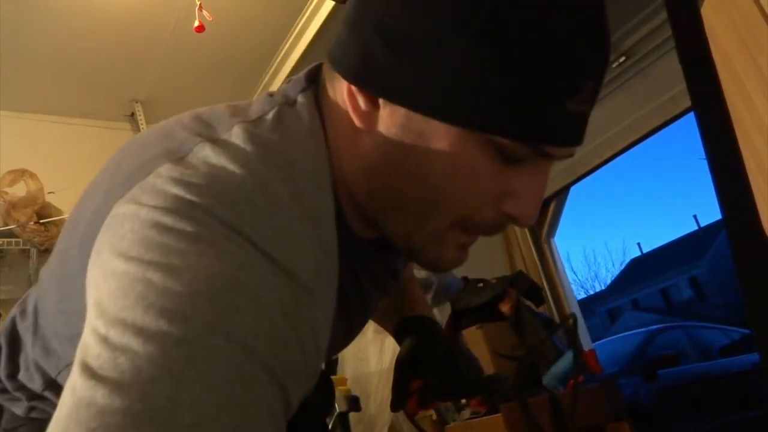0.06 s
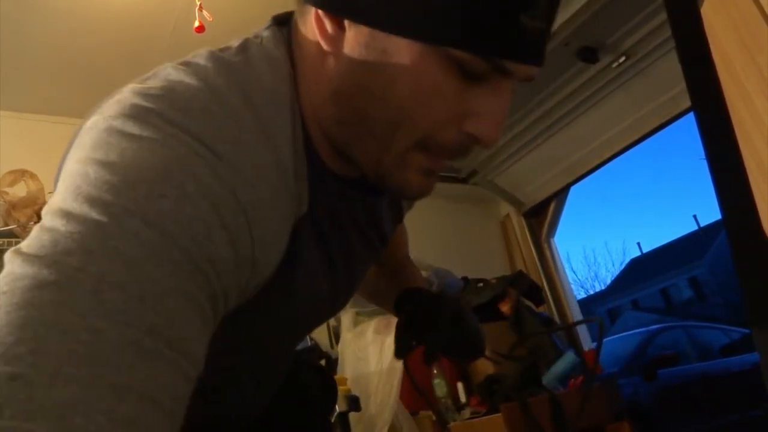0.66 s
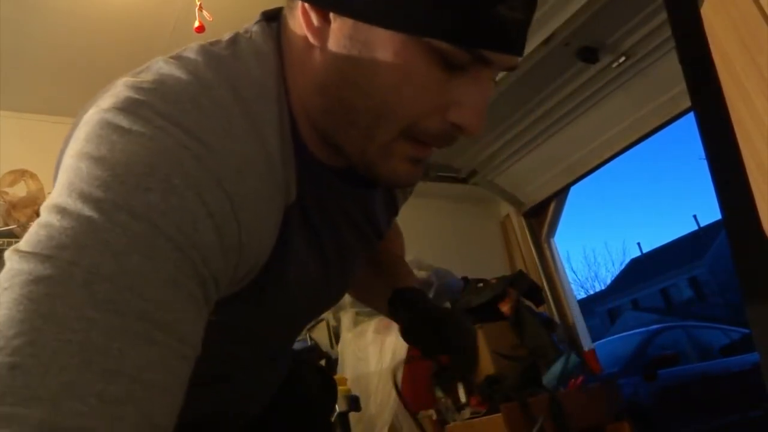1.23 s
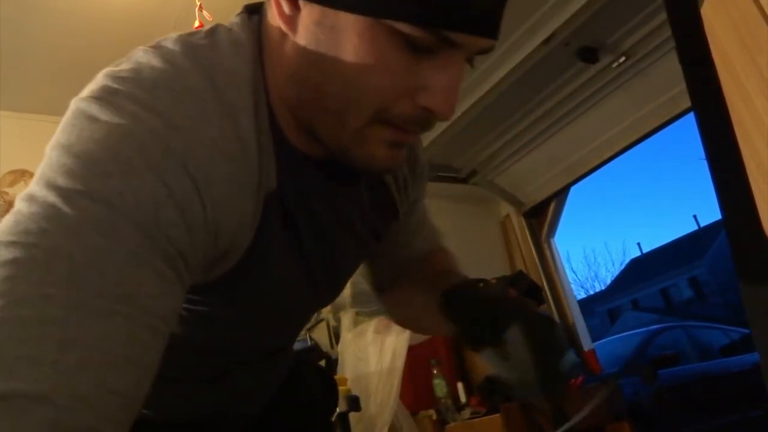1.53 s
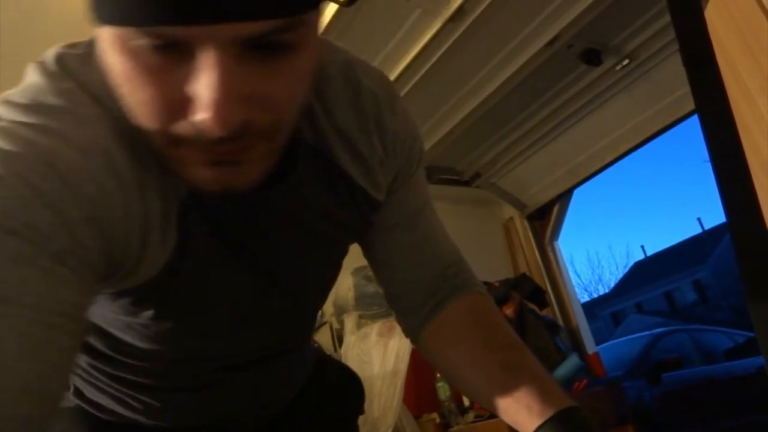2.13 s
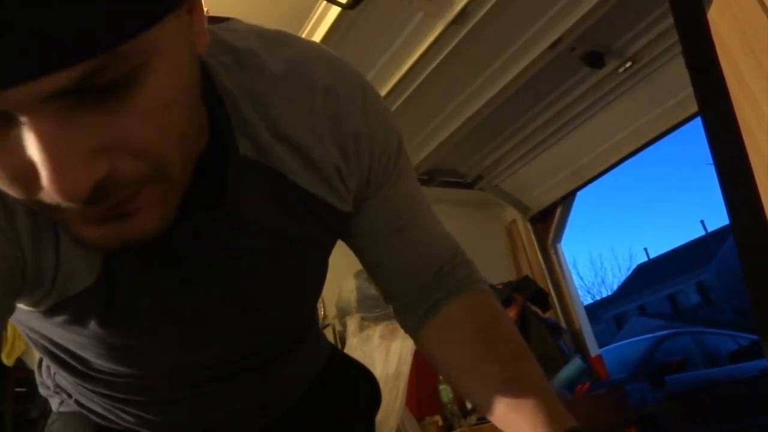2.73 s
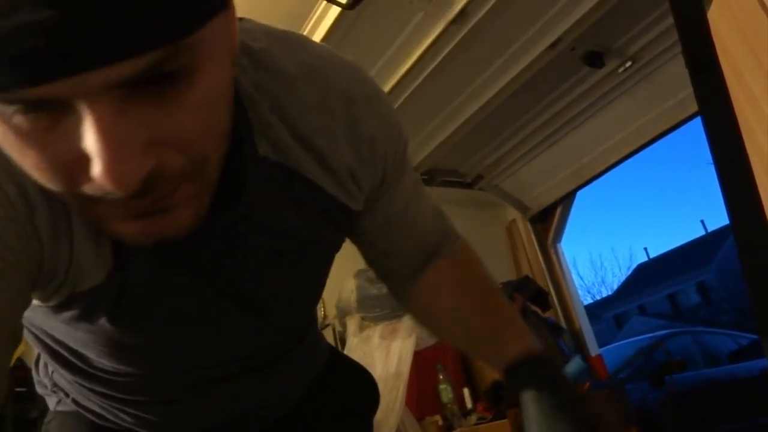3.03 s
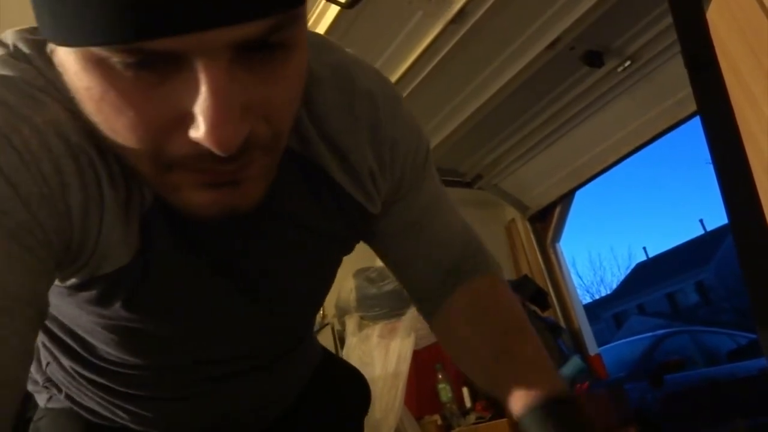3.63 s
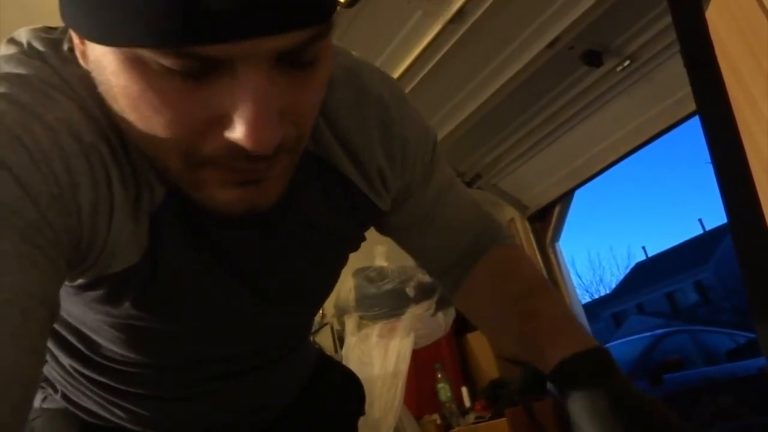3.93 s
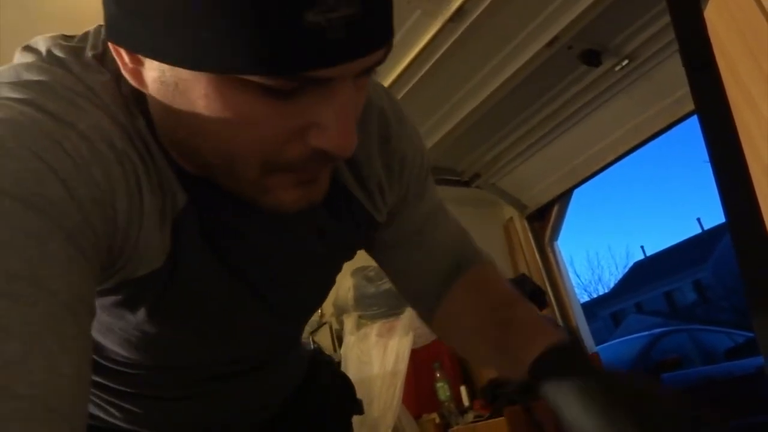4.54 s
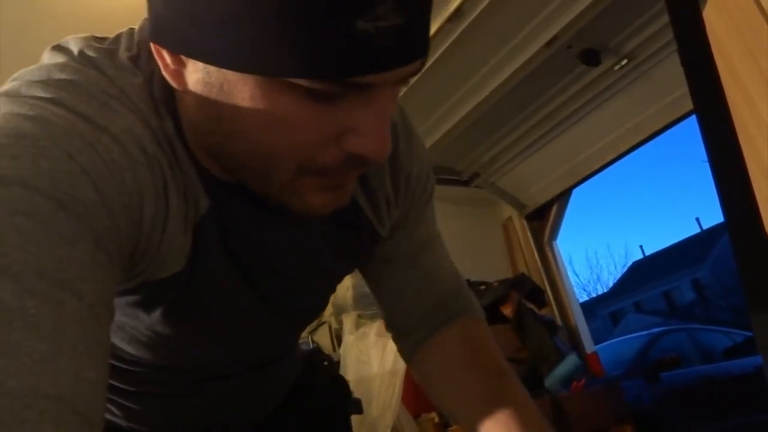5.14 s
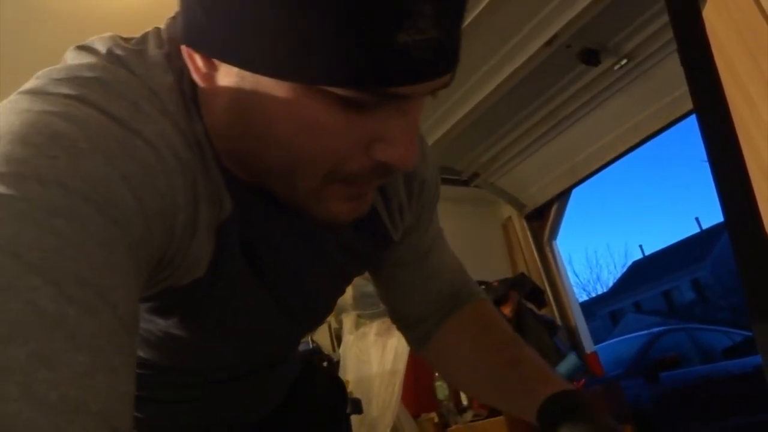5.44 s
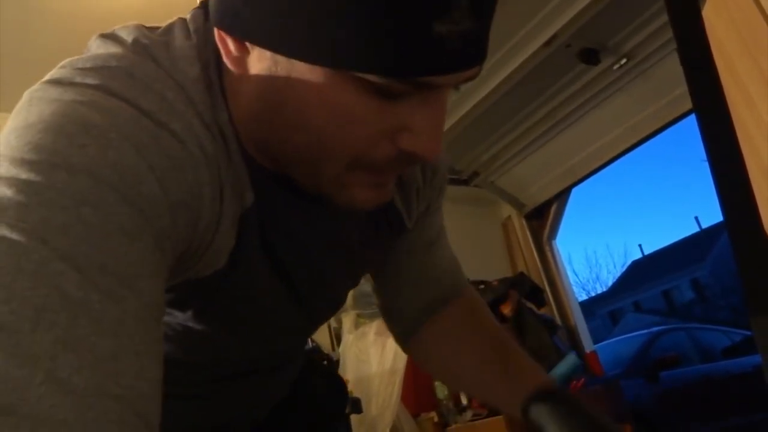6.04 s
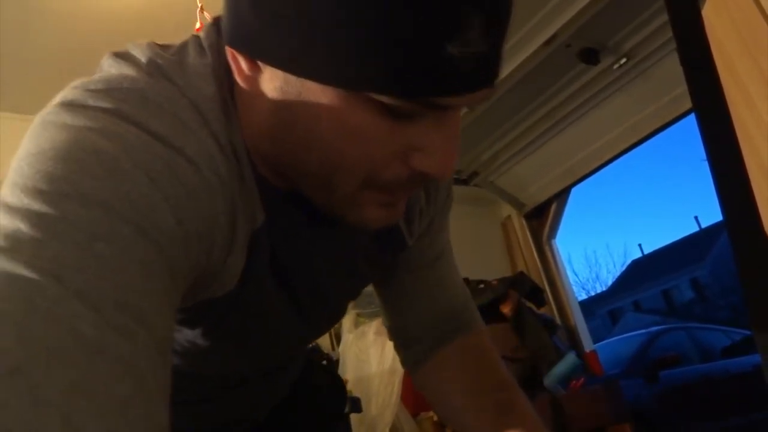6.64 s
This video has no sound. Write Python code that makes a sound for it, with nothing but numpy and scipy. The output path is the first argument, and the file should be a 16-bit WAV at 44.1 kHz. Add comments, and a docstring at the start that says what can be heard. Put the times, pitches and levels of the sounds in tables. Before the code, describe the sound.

Irregular close knocks and rubs on a plastic kayak hull, mixed with clicking, rasping wire and the rustle of gloves and sleeves.

```python
"""Fittings knock against a hollow plastic kayak as gloved hands work on it, close by in a quiet garage.
Each knock makes the hull, the deck and the fitting ring. Wire and gloves drag over the plastic, sticking
and slipping, and shake the same parts. Wire drawn through a fitting rasps with a gliding pitch, wire ends
click and a loose fitting pings. Sleeves and gloves rustle with each move of the arms."""
import sys
import numpy as np
from scipy import signal
from scipy.fft import rfft, irfft
from scipy.io import wavfile
from scipy.ndimage import uniform_filter1d

SR = 44100
rng = np.random.default_rng(int(sys.argv[2]) if len(sys.argv) > 2 else 0)


def store_pcm(level_fs):
    """Save levels as 16-bit WAV."""
    pcm = np.round(np.clip(level_fs, -1, 1) * 32767).astype(np.int16)
    wavfile.write(sys.argv[1], SR, np.atleast_2d(pcm).T)


N = 298998

# Levels in the tables are relative. A fade time (t60) is the time a sound takes to drop by 60 dB.
# tone of the still garage air: (frequency [Hz], level [dB])
AIR_SPECTRUM = [(18, -54.5), (30, -22), (629, -1.5), (1340, -9), (1650, -7.5), (2030, -5.5), (3980, -19.5),
                (4780, -17), (9890, -10), (15000, -28)]
# moves of the arms: (start [s], length [s], sleeve swish [dB], glove hiss [dB])
ARM_MOVES = [(-0.03, 0.031, -50, -94), (0.043, 0.16, -78.5, -92), (0.173, 0.098, -68.5, -68),
             (0.407, 0.094, -88.5, -89), (0.563, 0.033, -54.5, -65), (0.95, 0.058, -47, -55),
             (1.073, 0.074, -47.5, -60.5), (1.387, 0.039, -81, -76.5), (1.672, 0.42, -65.5, -64.5),
             (1.721, 0.066, -49.5, -55.5), (1.938, 0.038, -50.5, -58.5), (2.006, 0.041, -52, -57.5),
             (2.094, 0.27, -68, -74), (2.128, 0.035, -78, -62.5), (2.207, 0.073, -68.5, -69.5),
             (2.322, 0.03, -66, -62), (2.395, 0.076, -77, -64.5), (2.52, 0.13, -75, -86),
             (2.826, 0.11, -64.5, -65), (3.005, 0.083, -99, -83), (3.162, 0.077, -57, -70),
             (3.238, 0.022, -48, -49.5), (3.291, 0.091, -52, -60), (3.537, 0.075, -60, -62),
             (3.814, 0.081, -90.5, -62), (3.992, 0.24, -85, -91.5), (4.212, 0.23, -69.5, -77),
             (4.339, 0.066, -71.5, -63.5), (4.737, 0.061, -88, -80), (4.88, 0.085, -49.5, -59),
             (5.038, 0.35, -64, -72.5), (5.39, 0.2, -71, -92), (5.568, 0.19, -66, -78.5),
             (5.926, 0.052, -56, -61.5), (5.834, 0.1, -75, -80), (6.034, 0.084, -74, -65.5),
             (6.599, 0.18, -72, -74), (6.683, 0.12, -49, -57)]
# modes (pitches at which a thing rings) of sleeves and gloves: (pitch [Hz], width [Hz], level [dB])
SLEEVE_MODES = [(1100, 950, -6.5), (1840, 790, -4.5), (3020, 160, -2), (4100, 720, -8), (5680, 490, -12)]
GLOVE_MODES = [(5670, 1500, 1), (7660, 1900, 1), (9300, 1400, 2), (10400, 2500, -1), (13400, 3600, -8.5)]
# pings of a loose fitting: (time [s], level [dB], pitch [Hz], fade time [s])
FITTING_PINGS = [(0.305, -43, 1790, .22), (0.495, -42.5, 1820, .1), (2.154, -50, 1950, .13),
                 (5.643, -47, 1150, .09), (5.851, -63, 1780, .06)]
# clicks of wire ends and small plastic parts: (time [s], level [dB], pitch [Hz])
WIRE_CLICKS = [(0.0375, -63.5, 4960), (0.6399, -37, 4840), (0.6657, -40, 4060), (0.844, -59, 4000),
               (0.8746, -46.5, 4620), (1.0989, -33.5, 4420), (1.1307, -34, 4680), (1.4267, -66.5, 7900),
               (1.4483, -64.5, 8180), (1.5207, -65, 6020), (1.5946, -62.5, 5950), (1.9844, -48, 4800),
               (2.389, -43, 4900), (2.6775, -39.5, 4650), (2.762, -51, 4320), (3.6526, -53.5, 4010),
               (3.756, -47, 4100), (3.8886, -39, 4140), (4.276, -54.5, 5860), (5.243, -47, 4670),
               (5.3587, -55, 9790), (5.5958, -58.5, 7070), (5.6264, -51.5, 5900)]
# wire drawn through a fitting: (start [s], length [s], level [dB], lower pitch at start [Hz],
# lower pitch at end [Hz], upper pitch at start [Hz], upper pitch at end [Hz], upper against lower [dB])
WIRE_PULLS = [(0.2, 0.09, -66, 3000, 3100, 4200, 4450, 7),
              (0.775, 0.085, -45.5, 1660, 1300, 2380, 2200, -7),
              (0.765, 0.1, -58, 3400, 3150, 4400, 3950, -3), (0.882, 0.11, -50, 1620, 1430, 2300, 2050, -8),
              (2.12, 0.18, -67, 5500, 5700, 7000, 7300, -3),
              (3.258, 0.099, -49, 1800, 1400, 2600, 2130, -7),
              (3.78, 0.07, -51, 1750, 1850, 2300, 2300, -10)]
# modes of the four parts (hull, deck, fitting, ticking contact point): (pitch [Hz], width [Hz], level [dB])
HULL_MODES = [(105, 66, -20.5), (185.2, 18.7, -3), (258, 66, -2.5), (297.3, 53.6, -0.5), (362, 58, 3),
              (423, 110, 3), (502, 120, -1.5)]
DECK_MODES = [(534, 120, -1.5), (634.5, 130, 1), (719.3, 155, -2), (903, 149, -2.5), (1038, 138, 0.5),
              (1232, 320, -7)]
FITTING_MODES = [(1300, 270, -2.5), (1603, 170, 4), (1805, 201, 4.5), (2080, 486, -0.5), (2655, 730, -3)]
TICK_MODES = [(2800, 520, 3), (3390, 1990, 1), (3880, 1290, 1.5), (5840, 140, -19), (7900, 1400, -24),
              (10600, 10000, -33)]
# the range each part sends into the air: (low edge [Hz], high edge [Hz])
PART_BANDS = [(178, 850), (480, 1700), (1150, 5150), (2500, 8770)]
# how strongly each part is driven: (in a knock [dB], in a stroke [dB])
PART_DRIVE = [(2.5, -1.5), (4, 0.5), (5, -2.5), (-2, -4)]
# how much each part's level follows a contact: (weight [share], hardness [share], sharpness [share])
PART_SHARES = [(1, 0, 0), (0, 0, 0), (0, 1, 0), (0, 1, 1)]
# where each part sits between the ears: (left minus right [dB], stereo width as side against mid [dB])
PART_PLACES = [(1, -18), (0.5, -12.5), (-0.5, -9.5), (-2, -10.5)]
# fade time of a knock's echoes: (hull [s], deck [s], fitting [s], tick [s])
ECHO_FADE_S = [0.16, 0.18, 0.22, 0.16]
# extra echo in a knock: (hull [dB], deck [dB], fitting [dB], tick [dB])
EXTRA_ECHO_DB = [5.2, 13, 5, 11]
# how fast a stroke dies away: (hull [dB/s], deck [dB/s], fitting [dB/s], tick [dB/s])
STROKE_FADE_DB_PER_S = [318, 310, 273, 312]
# wire and gloves dragging on the plastic:
# (start [s], length [s], level [dB], weight on the hull [dB], hardness [dB], change of pressure [dB])
DRAG_STROKES = [(0.579, 0.07, -37, -17.5, -6, -7), (0.623, 0.12, -46.5, -19.5, 2.5, 1),
                (0.763, 0.0083, -47, -37, 6, -2), (0.837, 0.0097, -55, -32, 10.5, -10),
                (0.954, 0.044, -45.5, -16, 2, 1.5), (1.028, 0.017, -65, -10.5, 19.5, 0),
                (1.086, 0.062, -40.5, -12.5, 0.5, 2.5), (1.687, 0.31, -45.5, -1.5, -8, -6),
                (1.847, 0.048, -39, -4.5, -7, -9), (2.01, 0.041, -64.5, 7, -6, 3),
                (2.236, 0.16, -92, 23, -1, -10), (2.527, 0.066, -44, -8, -34, -3.5),
                (2.667, 0.0071, -34, -28, -5, -27), (2.673, 0.068, -41, -29, -16, -11),
                (2.811, 0.046, -48.5, 4, 5.5, 0.5), (2.889, 0.058, -64, -3, -35, 13),
                (3.088, 0.046, -87, 17, -26, -8), (3.288, 0.05, -54, -14, 9.5, 0),
                (3.425, 0.28, -70, -5.5, -5, 15), (3.571, 0.035, -38, -7, -12, 2.5),
                (3.643, 0.031, -45, 0.5, -1, -20), (3.834, 0.051, -67.5, -7.5, 13, 3),
                (3.858, 0.022, -34.5, 1, -2, 4), (3.889, 0.035, -50.5, 4, -13, 3),
                (4.132, 0.022, -66.5, 1, -3, -8), (4.394, 0.032, -44.5, 0.5, -6, -10),
                (4.89, 0.038, -38.5, -3, -1.5, 4.5), (5.114, 0.04, -50, 1, -8, 8),
                (5.263, 0.013, -37, -7, -2, -14), (5.94, 0.036, -37.5, -7, -2.5, 3.5),
                (5.98, 0.044, -39, -2, -19, 2.5), (6.181, 0.019, -29.5, -37, -13, -23),
                (6.196, 0.027, -43.5, -6, -15, 7), (6.44, 0.035, -61, -26, -1, 5),
                (6.454, 0.068, -39, -6, -6.5, -4.5), (6.7, 0.035, -38, -9, -3, 4)]
# fittings hitting the boat: (time [s], level [dB], weight on the hull [dB], hardness [dB], sharpness [dB],
# echo level [dB], deck pitch [Hz], fitting pitch [Hz], left minus right [dB])
HULL_KNOCKS = [(0.304, -44.5, -29, -0.5, -8.5, -12.5, 946, 1800, -0.5),
               (0.496, -78, -33.5, 13.5, -17, -4.5, 820, 1840, 4),
               (0.602, -43, -9, -11.5, 1.5, -16, 1030, 1500, 10),
               (0.643, -39, -18, -11, 1, -9, 1030, 1510, -2),
               (0.667, -43.5, -26, 1, -0.5, -9, 810, 1770, -0.5),
               (0.695, -41, -15, -0.5, -3, -8.5, 1050, 1900, -1.5),
               (0.72, -45, -29, -2.5, -3.5, 2, 1050, 1480, 0),
               (0.779, -59, -31, 6, -6.5, -6, 970, 1500, -4),
               (0.846, -54, -23, 1, -6, -5.5, 1050, 1450, -1),
               (0.877, -42, -24, -4.5, -0.5, 0, 610, 1400, -0.5),
               (0.939, -43, -24, 2.5, -15, -7, 1060, 1610, -2.5),
               (1.099, -41, -24.5, -4, 5.5, 10.5, 903, 1800, 8),
               (1.706, -41, -2.5, -9.5, -14, 6.5, 680, 1430, -2),
               (1.772, -47, 3.5, -5, 3.5, -7, 810, 1890, -1.5),
               (1.8, -46, -9, -7.5, -12, -3, 750, 1500, -3),
               (1.825, -41.5, -12, -8, -3.5, -5, 696, 1600, -2),
               (1.857, -46.5, -8.5, -3.5, -4, -6.5, 896, 1484, -1),
               (1.916, -34, -10, -5, -8.5, -10, 695, 1700, -1.5),
               (1.9189, -38, -6, -14, -11, -25, 1100, 1500, -1),
               (1.952, -39, 1.5, 1.5, -9, -2, 600, 1487, -1),
               (2.154, -83.5, 2, 25.5, -4, -8, 921, 1890, -3), (2.391, -63, -20, -1, 1, -8, 620, 1580, -4),
               (2.474, -52, -1, -4.5, -14, -3, 630, 1600, 0.5),
               (2.527, -36, -9.5, -3.5, -4.5, -9.5, 705, 1400, -1),
               (2.543, -43.5, -16, -3.5, -16, -5, 790, 1460, 3.5),
               (2.677, -38.5, -7.5, -5.5, -3, -2, 960, 1480, -0.5),
               (2.697, -43, -9.5, -22, -48, 1.5, 850, 1590, 0),
               (2.759, -41, -0.5, -1, -2.5, -6, 680, 2050, -0.5),
               (2.826, -50.5, -2, 1, 0.5, -10.5, 830, 2110, 14),
               (2.9, -64, 2, 15, -0.5, -0.5, 650, 1710, -1.5), (2.929, -61, -9, 9.5, -14, -9, 745, 1930, 2),
               (2.984, -53.5, 5.5, 7.5, -3, -13.5, 740, 2420, 0),
               (3.142, -84, 5.5, 5.5, 9, 4, 870, 1840, 4),
               (3.25, -75.5, 2.5, 29.5, 1.5, -4, 1130, 2000, 1.5),
               (3.583, -39, 1, -1.5, -6, -7, 940, 1300, -0.5),
               (3.597, -43, -12, -6, -22, -16, 805, 1310, -1),
               (3.652, -45.5, -18, -6, -6, -1.5, 810, 1590, -1.5),
               (3.757, -45, -26, -4, -11.5, -5.5, 1100, 1390, -2.5),
               (3.791, -58, -8, 3, -19, -10.5, 1100, 1750, 1), (3.869, -39.5, 1, -1, -5, -13, 715, 1580, 8),
               (3.947, -56, 1, 4.5, -15.5, -13.5, 950, 1540, -2),
               (4.106, -51.5, -13.5, -2, -15, -10.5, 900, 2060, -4),
               (4.278, -48.5, -1.5, 2, -3.5, -8, 1220, 1460, 0),
               (4.319, -55, -2.5, -1.5, -5, -1.5, 835, 1570, -1),
               (4.358, -48.5, -16, 3, -8.5, 19, 970, 1610, -1),
               (4.382, -39, -16.5, -3.5, -8.5, -3, 740, 1510, -1),
               (4.433, -47, -7, -5, 3.5, -14, 800, 2110, 0.5),
               (4.694, -70.5, -18, 18, -17, -11, 1080, 2040, -4),
               (4.719, -71, -16, 8.5, -7.5, -2.5, 997, 2000, -2.5),
               (4.736, -62.5, -7.5, -10, -6, 6, 752, 1940, 0),
               (4.962, -50, -7, -2, -5, -10.5, 864, 1700, -0.5),
               (5.093, -43, -46, -0.5, -9.5, -3, 1160, 1540, 0.5),
               (5.118, -44, -20, -8, -12.5, 12, 1100, 1510, 0),
               (5.129, -42.5, -25, 6, -8, -13.5, 740, 1720, -1.5),
               (5.243, -49, -32.5, 2.5, -8.5, 0, 1175, 1440, 1.5),
               (5.41, -73, -8, 17, -6, 7, 1134, 1880, 1.5),
               (5.902, -53, -7.5, -14.5, -3, 15, 617, 1560, -2.5),
               (5.942, -49.5, -18, -6.5, 4, -5, 900, 1600, 17.5),
               (5.978, -32.5, -12, -7.5, -6.5, -13.5, 770, 1670, -0.5),
               (6.048, -45.5, -21, 3, -11, -6.5, 870, 1860, -1.5),
               (6.124, -81, -23, 21.5, -9, -7, 900, 2120, -5),
               (6.187, -43.5, -11, -2.5, -10.5, 13, 865, 1590, -0.5),
               (6.356, -71.5, -10, -2, -12, 8, 724, 1390, 3.5),
               (6.444, -55, -16, -7.5, 1.5, 2, 806, 1580, 2), (6.481, -39.5, -5, -6, -7, -7, 734, 1570, 0),
               (6.633, -53, -19, -2.5, 6, -6, 1060, 1470, 2.5),
               (6.715, -39, -7.5, -0.5, -7, -5, 1030, 1570, 0.5)]

RING_OUT_S = .3   # time allowed for a sound to die away
MOVE_ATTACK_S, PING_ATTACK_S, STROKE_ATTACK_S = 0.026, 0.0013, .012   # time to swell up
FOLD_S, FOLD_SHIFT_DB = .05, 5   # how often moving cloth meets new echoes; how far folds shift its tone
SNAPS_PER_S, SNAP_DB, SNAP_SPREAD_DB, SNAP_CYCLES = 110, -2, 4.5, 12
WIRE_WIDTHS_HZ = (170, 300)   # lower and upper mode
ROLL_S, ROLL_SHARE = (.00023, .00061, .0011), .45   # loop delays; share passed round again
DEEP_HZ, DEPTH_PER_WEIGHT, EVEN_WEIGHT_DB = 400, .5, -2   # lighter contacts lose the modes below DEEP_HZ
STROKE_SHARPNESS_DB, SHARPNESS_PER_HARDNESS = -10.5, 0.069
CONTACT_S, SHARPNESS_DB_PER_HALVING = .00007, 27   # a sharper contact is shorter
BLOW_S = .02   # a knock's level counts all its energy as if packed into this time


def from_db(db):
    """Turn decibels into a gain to multiply by."""
    return 10 ** (np.asarray(db) / 20)


def rms_one(x):
    """Scale a sound to an average power of 1."""
    return x / np.sqrt(np.mean(x ** 2) + 1e-20)


def to_ears(mid_side, pan_db):
    """Turn mid (what both ears share) and side (how they differ) into left and right."""
    mid, side = mid_side
    return np.array([mid + side, mid - side]) * from_db([[pan_db / 2], [-pan_db / 2]])


def wavering(depth_db, rate, size=N):
    """A gain that wanders by chance, reaching a new value `rate` times a second."""
    targets = from_db(depth_db * rng.standard_normal(int(size / SR * rate) + 2))
    return np.interp(np.arange(size) / SR * rate, np.arange(len(targets)), targets)


def steady(mid_side, window_s):
    """Even out the loudness of a texture but keep its fast grain."""
    power = uniform_filter1d(mid_side[0] ** 2, max(int(window_s * SR), 64))
    return mid_side / np.sqrt(np.maximum(power, 0) + 1e-3 * np.mean(power))


def during(start_s, length_s):
    """The samples that cover a movement and its dying away."""
    return np.arange(max(int(start_s * SR), 0), min(int((start_s + length_s + RING_OUT_S) * SR), N))


def gesture(t, length_s, level_db, change_db, attack_s, fade_db_per_s):
    """Gain of one movement: it rises, holds while the pressure changes evenly, then dies away."""
    held_db = level_db + change_db * (np.clip(t / length_s, 0, 1) - .5)
    faded_db = fade_db_per_s * np.maximum(t - length_s, 0)
    return np.clip(t / attack_s, 0, 1) ** 2 * from_db(held_db - faded_db)


def gestures(rows, attack_s, fade_db_per_s):
    """Joint gain of several movements, each given as (start [s], length [s], level [dB])."""
    power = np.zeros(N)
    for start_s, length_s, level_db in rows:
        now = during(start_s, length_s)
        power[now] += gesture(now / SR - start_s, length_s, level_db, 0, attack_s, fade_db_per_s) ** 2
    return np.sqrt(power)


def slips(per_s, spread_db, smooth_db, size=N):
    """Friction: tiny catches of uneven size on top of smooth sliding."""
    sizes = from_db(spread_db * np.minimum(rng.exponential(1, size), 4)) * rng.choice([-1, 1], size)
    catches = rms_one(sizes * (rng.random(size) < per_s / SR))
    return catches + from_db(smooth_db) * rng.standard_normal(size)


def radiate(x, band_hz):
    """A part sends out little sound outside its own range of pitches."""
    return signal.sosfilt(signal.butter(2, band_hz, "band", fs=SR, output="sos"), x)


def resonate(x, modes, band_hz, wander_db=0):
    """Ring all modes and add them with alternating signs; a moving contact drives each one unevenly."""
    out = 0
    for k, (hz, width, db) in enumerate(modes):
        r = np.exp(-np.pi * width / SR)   # share of the ring left after one sample
        poles = [1, -2 * r * np.cos(2 * np.pi * hz / SR), r * r]
        gain = (-1) ** k * from_db(db) * (1 - r * r) / 2
        drive = x * wavering(wander_db, rate=18, size=x.shape[-1]) if wander_db else x
        out = out + signal.lfilter([gain, 0, -gain], poles, drive + 1e-18)
    return radiate(out, band_hz)


def reflections(t60, tail_db, side_db, build_s=0.00027):
    """One direct tap, then a tail of dense echoes from hull and garage, as mid and side."""
    t = np.arange(int(t60 * SR)) / SR
    noise = rng.standard_normal((2, SR // 3))[:, :len(t)]
    tail = noise * np.exp(-np.log(1000) * t / t60) * (1 - np.exp(-t / build_s))
    tail *= from_db(tail_db) / np.sqrt(np.sum(tail[0] ** 2))
    tail[0, 0] += 1   # the direct tap
    return tail * from_db([[0], [side_db]])


def echoed(x, t60, tail_db, side_db):
    """A sound together with its echoes, as mid and side."""
    return signal.oaconvolve(x[None], reflections(t60, tail_db, side_db), axes=1)[:, :len(x)]


def garage_air():
    """Still air: a very faint, even noise."""
    hz, db = np.transpose(AIR_SPECTRUM)
    all_hz = np.arange(N // 2 + 1) * SR / N
    shape = from_db(np.interp(np.log(all_hz + 1), np.log(hz), db))
    noise = rms_one(irfft(rfft(rng.standard_normal((2, N))) * shape, N))
    return from_db(-94) * to_ears(noise * from_db([[0], [-8]]), pan_db=0)


def moving_echoes(x, t60, tail_db, side_db, count=5):
    """A moving source meets several sets of echoes in turn, so no one pitch stands out for long."""
    turn = (np.arange(N) / SR / FOLD_S).astype(int) % count
    return sum(echoed(x * (turn == k), t60, tail_db, side_db) for k in range(count))


def cloth(modes, band_hz, crackle_db, flutter_db, side_db):
    """Fibres snag and slide past each other; moving folds shift the tone, nearby surfaces add echoes."""
    fibres = slips(per_s=330, spread_db=crackle_db, smooth_db=-0.5) * wavering(flutter_db, rate=240)
    heard = moving_echoes(fibres, t60=0.048, tail_db=2.0, side_db=side_db)
    rustle = resonate(heard, modes, band_hz, wander_db=FOLD_SHIFT_DB)
    return to_ears(steady(rustle, window_s=0.026), pan_db=-1.5)


def crinkle():
    """Creases in glove and insulation snap one by one, each ringing briefly at a high pitch."""
    pitches = np.geomspace(3500, 13500, num=12)
    sizes = from_db(SNAP_SPREAD_DB * np.minimum(rng.exponential(1, N), 3))
    snaps = sizes * (rng.random(N) < SNAPS_PER_S / SR)
    chosen_pitch = rng.integers(0, len(pitches), N)
    rings = 0
    for k, hz in enumerate(pitches):
        r = from_db(-60 * hz / (SNAP_CYCLES * SR))   # fades by 60 dB in SNAP_CYCLES swings
        poles = [1, -2 * r * np.cos(2 * np.pi * hz / SR), r * r]
        rings = rings + signal.lfilter([1, 0, -1], poles, snaps * (chosen_pitch == k) + 1e-18)
    return rms_one(to_ears(echoed(rings, t60=0.052, tail_db=2.0, side_db=-12.0), pan_db=-4.5))


def sleeves_and_gloves():
    """Each move of an arm makes a dull swish of the sleeve and a fine, crinkling hiss of glove and cuff."""
    moves = np.array(ARM_MOVES)
    swish_gain = gestures(moves[:, [0, 1, 2]], MOVE_ATTACK_S, fade_db_per_s=311)
    hiss_gain = gestures(moves[:, [0, 1, 3]], MOVE_ATTACK_S, fade_db_per_s=386.5)
    # the arms are never quite still, so a little rustle always remains
    swish_gain = np.hypot(swish_gain, from_db(-99)) * from_db(-0.5)
    hiss_gain = np.hypot(hiss_gain, from_db(-103)) * from_db(-2.5)
    grip = wavering(2.0, rate=40)
    swish = cloth(SLEEVE_MODES, (750, 7000), crackle_db=4.0, flutter_db=3.0, side_db=-6.0)
    hiss = cloth(GLOVE_MODES, (5000, 15500), crackle_db=2.5, flutter_db=5.0, side_db=-7.0)
    hiss += from_db(SNAP_DB) * crinkle()
    return grip * (swish_gain * swish + hiss_gain * hiss)


def fitting_pings():
    """A soft touch rings a single mode of a loose fitting."""
    out = np.zeros(N)
    for s, level_db, hz, t60 in FITTING_PINGS:
        now = during(s, 0)
        t = np.maximum(now / SR - s, 0)
        rise = 1 - np.exp(-t / PING_ATTACK_S)
        out[now] += from_db(level_db - 60 * t / t60) * rise * np.sin(2 * np.pi * hz * t)
    return out


def rolled(x):
    """A rounded piece rolls as it lands: short delay loops spread its click in time and keep its tone."""
    for delay_s in ROLL_S:
        loop = np.zeros(int(delay_s * SR) + 1)
        loop[0], loop[-1] = 1, ROLL_SHARE
        x = signal.lfilter(loop[::-1], loop, x)
    return x


def wire_clicks():
    """A wire end flicks against plastic: one broad, high mode and faint echoes."""
    out = np.zeros((2, N + SR))
    for s, level_db, hz in WIRE_CLICKS:
        flick = rolled(reflections(t60=0.098, tail_db=-5.5, side_db=-9.5))
        ring = resonate(flick, modes=[(hz, 1600, 0)], band_hz=(3000, 11000))
        ring /= np.abs(ring[0]).max()
        at = int(s * SR)
        out[:, at:at + ring.shape[1]] += from_db(level_db + 2) * to_ears(ring, pan_db=-4.5)
    return out[:, :N]


def gliding(x, hz, width_hz):
    """One mode with a moving pitch: shift that pitch down to zero, smooth the sound, shift it back."""
    turn = np.exp(2j * np.pi * np.cumsum(hz) / SR)
    r = np.exp(-np.pi * width_hz / SR)
    return np.real(turn * signal.lfilter([(1 - r) ** 2], [1, -2 * r, r * r], x / turn))


def wire_pulls():
    """Friction rings the drawn wire; its two modes glide as the free length changes."""
    friction = slips(per_s=800, spread_db=1.5, smooth_db=3)
    heard = echoed(friction, t60=0.19, tail_db=-0.5, side_db=-11.0)
    out = np.zeros((2, N))
    for s, length_s, level_db, low_start, low_end, high_start, high_end, upper_db in WIRE_PULLS:
        now = during(s, length_s)
        lower_hz = np.interp(now / SR, (s, s + length_s), (low_start, low_end))
        upper_hz = np.interp(now / SR, (s, s + length_s), (high_start, high_end))
        lower = steady(gliding(heard[:, now], lower_hz, WIRE_WIDTHS_HZ[0]), window_s=0.024)
        upper = steady(gliding(heard[:, now], upper_hz, WIRE_WIDTHS_HZ[1]), window_s=0.024)
        force = gesture(now / SR - s, length_s, level_db, change_db=0, attack_s=.035, fade_db_per_s=290)
        out[:, now] += force * (lower + from_db(upper_db) * upper) / np.hypot(1, from_db(upper_db))
    return to_ears(radiate(out, band_hz=(850, 5200)), pan_db=-3.0)


def boat_thump(contacts):
    """Every contact also pushes the whole boat, which adds a weak, deep thump."""
    noise = to_ears(rng.standard_normal((2, N)) * from_db([[0], [-10]]), pan_db=0)
    return from_db(-19.0) * radiate(np.abs(contacts[0]) * noise, band_hz=(20, 125))


def hull_under(weight_db):
    """The heavier the contact, the more the deep modes of the hull sound."""
    db_per_octave = DEPTH_PER_WEIGHT * np.clip(weight_db - EVEN_WEIGHT_DB, -14, 2)
    return [(hz, width, db + db_per_octave * max(np.log2(DEEP_HZ / hz), 0))
            for hz, width, db in HULL_MODES]


def part_db(part, level_db, weight_db, hardness_db, sharpness_db):
    """A heavy contact reaches into the hull, a hard one rings the fitting, a sharp one adds a tick."""
    return level_db + np.dot(PART_SHARES[part], (weight_db, hardness_db, sharpness_db))


def drag_strokes():
    """Wire and gloves catch and slip on the plastic; every stroke shakes all four parts."""
    out = np.zeros((2, N))
    for s, length_s, level_db, weight_db, hardness_db, change_db in DRAG_STROKES:
        now = during(s, length_s)
        friction = slips(per_s=870, spread_db=4.0, smooth_db=-8.0, size=len(now))
        sharpness_db = STROKE_SHARPNESS_DB + SHARPNESS_PER_HARDNESS * hardness_db
        for k, modes in enumerate((hull_under(weight_db), DECK_MODES, FITTING_MODES, TICK_MODES)):
            part_pan_db, side_db = PART_PLACES[k]
            db = part_db(k, level_db, weight_db, hardness_db, sharpness_db) + PART_DRIVE[k][1]
            force = gesture(now / SR - s, length_s, db, change_db, STROKE_ATTACK_S,
                            STROKE_FADE_DB_PER_S[k])
            shaken = echoed(friction, t60=0.077, tail_db=0.5, side_db=side_db)
            rub = resonate(shaken, modes, PART_BANDS[k], wander_db=3.0)
            out[:, now] += force * to_ears(steady(rub, window_s=0.03), part_pan_db + .5)
    return out


def struck_at(modes, pitch_hz=None, focus_db_per_octave=9, scatter_db=3.0, detune_octaves=.05):
    """The spot hit favours modes near its pitch; a hand on the plastic detunes them, and levels vary."""
    hz, width, db = np.transpose(modes)
    octaves_away = np.abs(np.log2(hz / pitch_hz)) if pitch_hz else 0
    louder, higher = rng.standard_normal((2, len(hz)))
    struck_db = db - focus_db_per_octave * octaves_away + scatter_db * louder
    return zip(hz * 2 ** (detune_octaves * higher), width, struck_db)


def cushioned(x, sharpness_db):
    """A blunt contact lasts longer, which smooths the blow and makes it duller."""
    contact_s = CONTACT_S * 2 ** (-sharpness_db / SHARPNESS_DB_PER_HALVING)
    r = np.exp(-1 / (SR * contact_s))
    return signal.lfilter([(1 - r) ** 2], [1, -2 * r, r * r], x)


def hull_knocks(lead_s=.0003):
    """Each blow rings hull, deck, fitting and contact point, then dies away in the boat and the garage."""
    out = np.zeros((2, N + SR))
    for (s, level_db, weight_db, hardness_db, sharpness_db,
         echo_db, deck_hz, fitting_hz, pan_db) in HULL_KNOCKS:
        at = int((s - lead_s) * SR)
        parts = {"hull": struck_at(hull_under(weight_db), detune_octaves=0),
                 "deck": struck_at(DECK_MODES, deck_hz),
                 "fitting": struck_at(FITTING_MODES, fitting_hz),
                 "tick": struck_at(TICK_MODES, scatter_db=2.0)}
        for k, (name, modes) in enumerate(parts.items()):
            part_pan_db, side_db = PART_PLACES[k]
            blow = reflections(ECHO_FADE_S[k], echo_db + EXTRA_ECHO_DB[k], side_db)
            if name != "tick":
                blow = cushioned(blow, sharpness_db)
            if name in ("fitting", "tick"):
                blow = rolled(blow)
            ring = resonate(blow, modes, PART_BANDS[k])
            ring /= np.sqrt(np.sum(ring[0] ** 2) / (BLOW_S * SR))
            db = part_db(k, level_db, weight_db, hardness_db, sharpness_db) + PART_DRIVE[k][0]
            out[:, at:at + ring.shape[1]] += from_db(db) * to_ears(ring, part_pan_db + pan_db)
    return out[:, :N]


def scene():
    """Knocks and strokes on the boat, with the smaller sounds and the air around them."""
    contacts = hull_knocks() + drag_strokes()
    boat = contacts + boat_thump(contacts)
    return boat + sleeves_and_gloves() + garage_air() + wire_pulls() + fitting_pings() + wire_clicks()


def record(dry, cutoff_hz=15800):
    """The very highest treble is cut off steeply."""
    return signal.sosfilt(signal.ellip(10, .2, 70, cutoff_hz, fs=SR, output="sos"), dry)


dry = scene()
out = record(dry)
store_pcm(out)
```